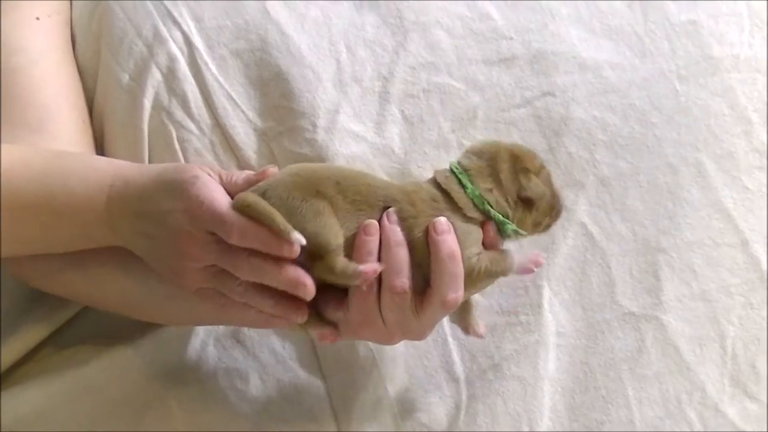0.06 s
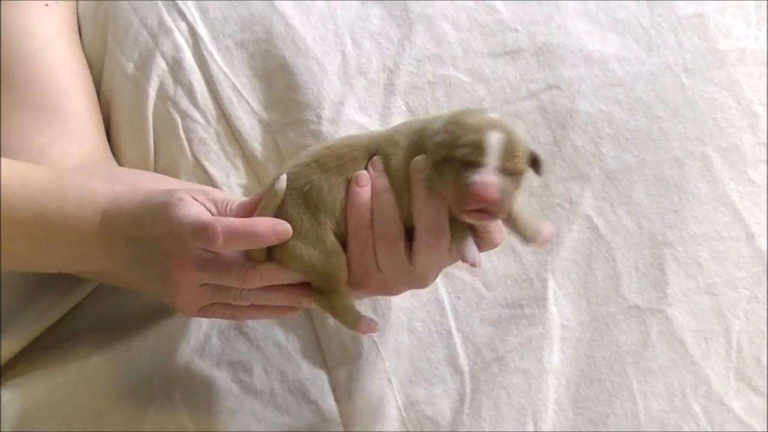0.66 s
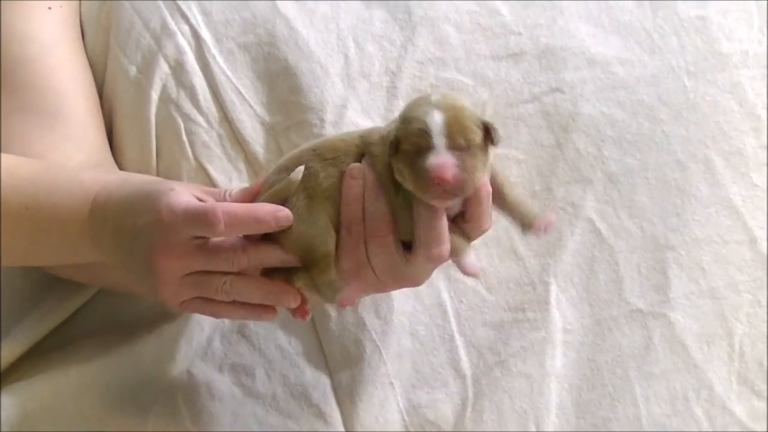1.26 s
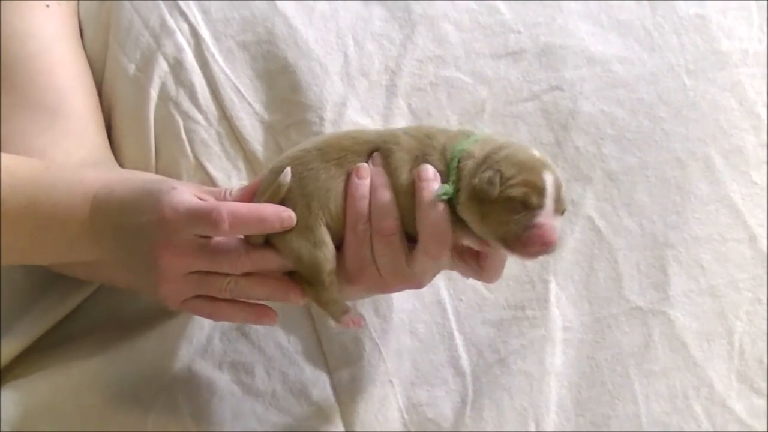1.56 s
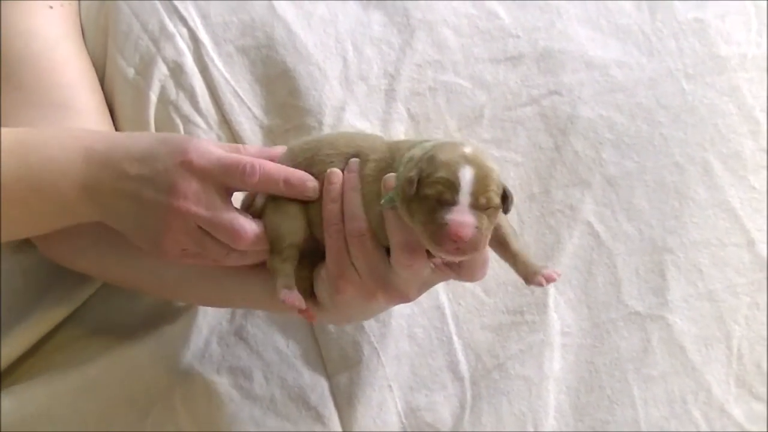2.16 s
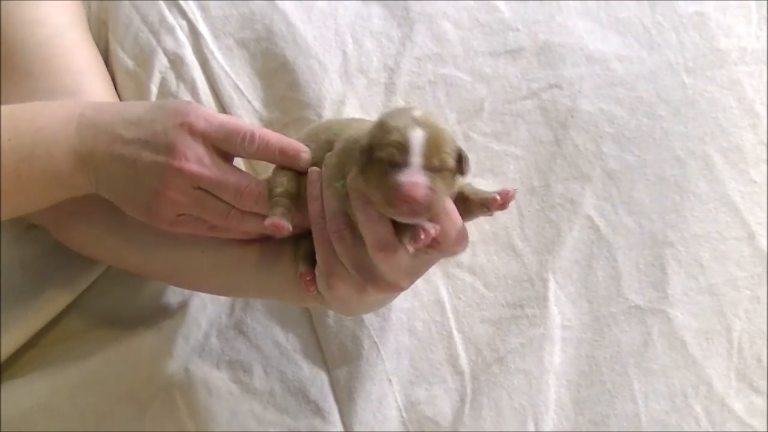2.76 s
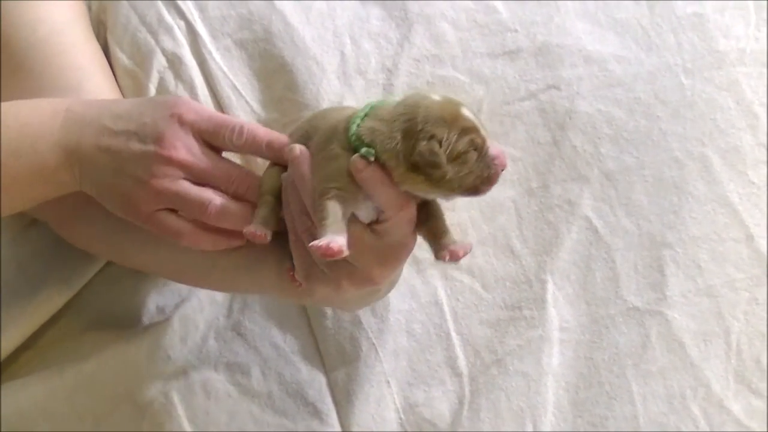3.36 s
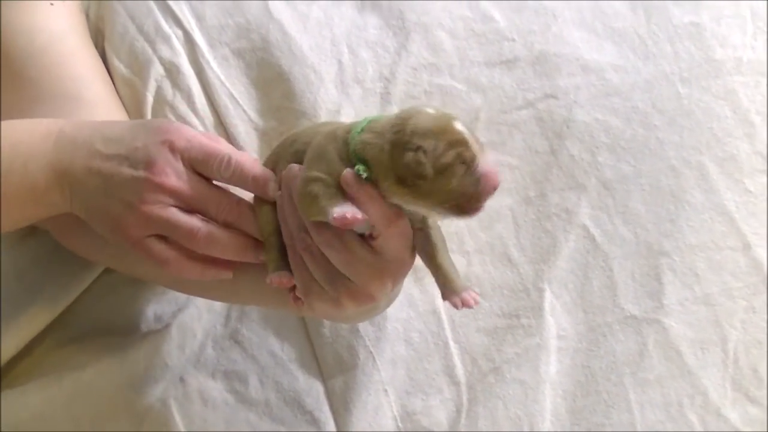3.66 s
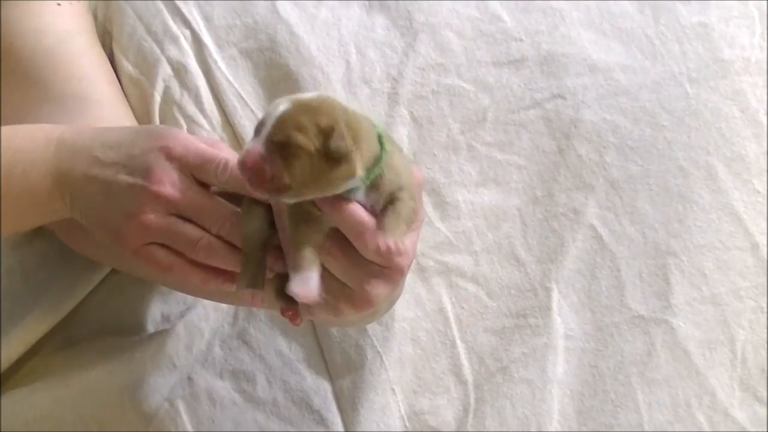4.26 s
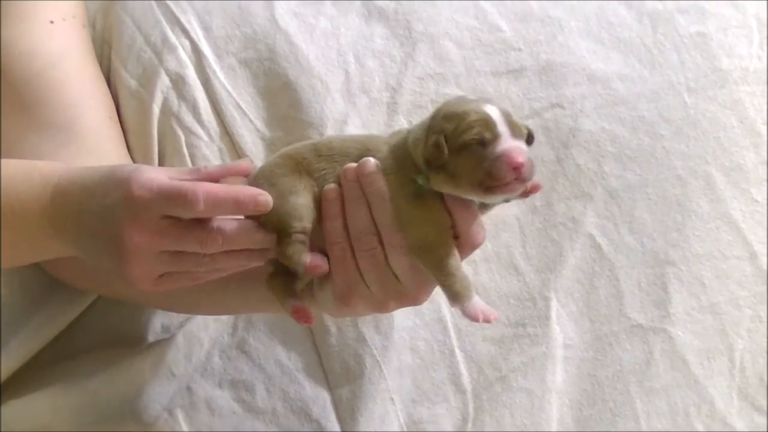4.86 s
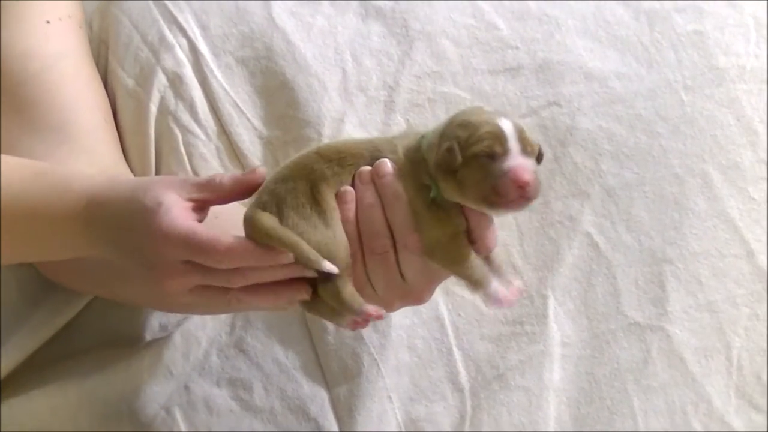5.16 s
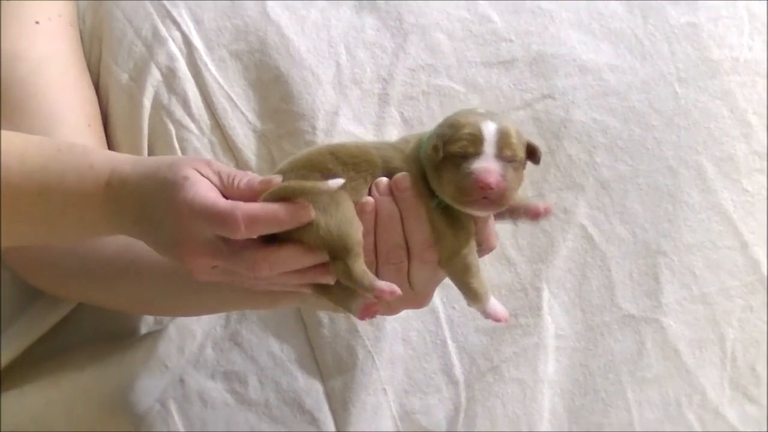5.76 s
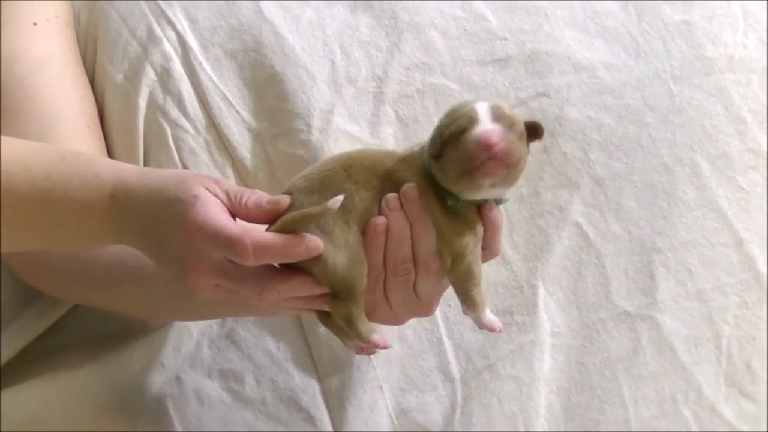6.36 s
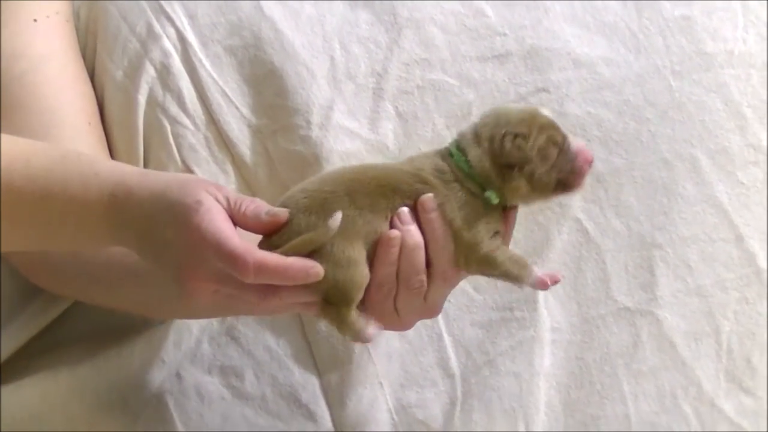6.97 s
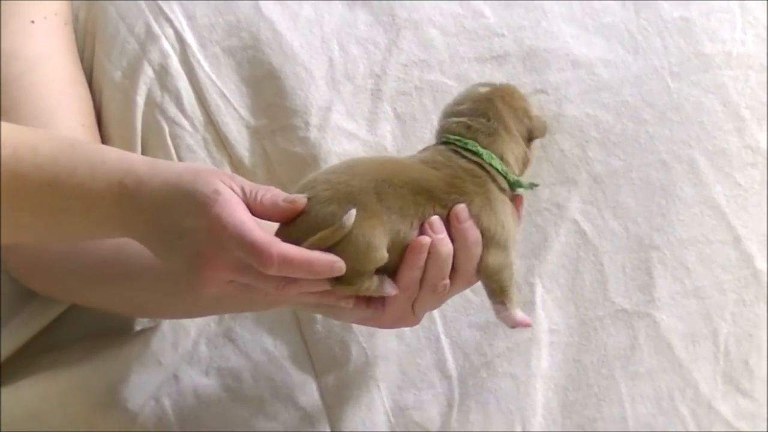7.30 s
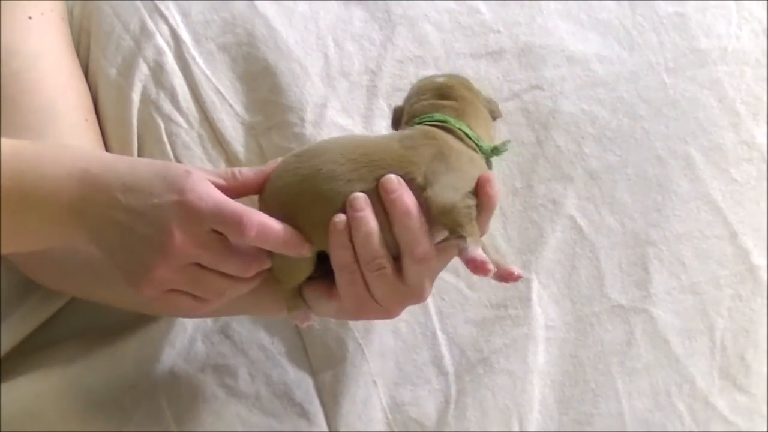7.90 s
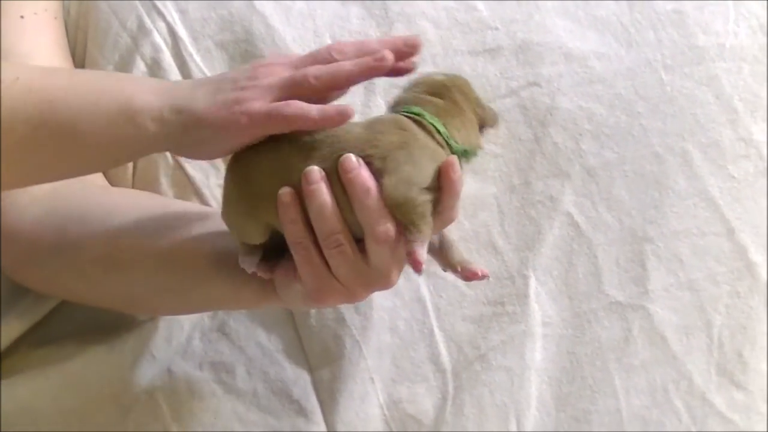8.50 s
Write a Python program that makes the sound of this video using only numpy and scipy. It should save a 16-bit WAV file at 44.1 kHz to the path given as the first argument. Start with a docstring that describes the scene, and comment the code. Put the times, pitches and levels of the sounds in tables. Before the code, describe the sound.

A newborn puppy cries close by in a small room, eighteen short cries, each a single tone that arches up and down in pitch with a brief echo. Two high squeals come in the first second. From about 1 to 2.5 seconds it drops to four weak, low, closed-mouth whines, and short snuffles puff through its snout between 0.5 and 3 seconds. From 3 to 4.7 seconds come four piercing squeals, the loudest stretch. A faint whimper at 5 seconds leads to three softer, gliding whines between 5.4 and 6.8 seconds. Two more loud squeals follow at 7 and 7.5 seconds, the first cracking hoarsely. A milder whine at 8 seconds and a low, quiet one at 8.5 seconds close it. A steady ventilation rumble with a low, wavering hum lies underneath throughout.

```python
"""A newborn puppy crying

A puppy, held in two hands in a small room, cries eighteen times: low closed-mouth whines and piercing
squeals. Each cry is one tone from its vocal folds, with harmonics (whole multiples of the pitch), that
arches up and down; the room smears the glides. Between the weak whines the puppy snuffles through its
snout. A ventilation rumble and a low hum lie underneath."""
import sys
import numpy as np
from scipy import signal
from scipy.fft import rfft, irfft, next_fast_len
from scipy.io import wavfile
from scipy.ndimage import uniform_filter1d, minimum_filter1d, map_coordinates

SR = 44100
rng = np.random.default_rng(int(sys.argv[2]) if len(sys.argv) > 2 else 0)


def dump(signal):
    """Clip the signal to [-1, 1] and save it as 16-bit WAV at the path in sys.argv[1]."""
    limited = np.clip(np.atleast_2d(signal).T, -1, 1)
    pcm = np.round(limited * 32767).astype(np.int16)
    wavfile.write(sys.argv[1], SR, pcm)


N = 385434
TOP_HZ = 15700  # upper edge of the sound
STEP = 32  # samples between updates of the overtone gains

# Treble colour of a whine: nasal peaks near 8 and 13 kHz, then a steep fall at the sound's
# upper edge: f/Hz, level/dB
WHINE_COLOUR = [(4000, -30), (5200, -26), (6500, -23.5), (8300, -9.5), (10500, -18.5), (12800, -9.5),
                (14200, -21), (15600, -48)]
# Treble colour of a squeal: peaks near 4, 7 and 10 kHz, then a steep fall at that edge: f/Hz, level/dB
SQUEAL_COLOUR = [(4200, 1), (5400, -22), (6200, -3), (7200, 0.5), (8700, -15.5), (10300, -5.5), (12500, -9),
                 (14200, -12.5), (15600, -30)]


def amp(db):
    """Turn decibels into a gain to multiply by."""
    return 10 ** (np.asarray(db) / 20)


def unit(x):
    """Scale x to an average power of 1."""
    return x / np.sqrt(np.mean(x ** 2) + 1e-20)


def along(points, hz):
    """Read a (frequency, value) table at hz, with octaves evenly spaced."""
    freqs, values = np.transpose(points)
    return np.interp(np.log(hz + 1), np.log(freqs), values)


def wobble(rate, size, per_second=SR):
    """A smooth curve through `rate` random values a second."""
    knots = rng.standard_normal(int(size * rate / per_second) + 4)
    fine = map_coordinates(knots, [np.arange(4 * len(knots)) / 4])
    return np.interp(4 * np.arange(size) * rate / per_second, np.arange(len(fine)), fine)


def filtered(x, response):
    """Multiply each frequency in x by response(hz)."""
    size = x.shape[-1]
    padded = next_fast_len(size + SR // 4)
    return irfft(rfft(x, padded) * response(np.fft.rfftfreq(padded, 1 / SR)), padded)[..., :size]


def coloured(noise, colour):
    """Shape noise by a (frequency, level) table, at a power of 1."""
    return unit(filtered(noise, lambda hz: amp(along(colour, hz))))


def noise_pair(likeness, size):
    """White stereo noise; a table says how alike left and right are at each frequency."""
    def shares(hz):
        angle = np.arccos(np.clip(along(likeness, hz), -1, 1)) / 2
        return np.array([np.cos(angle), np.sin(angle)])
    mid, side = filtered(rng.standard_normal((2, size)), shares)
    return np.array([mid + side, mid - side])


def ventilation(hum_hz=158.8, hum_db=-42.5, air_db=-32.32):
    """Moving air rumbles steadily, with a wavering hum."""
    # Colour of the rumble: f/Hz, level/dB
    rumble_colour = [(25, -42), (40, -17), (55, -12.5), (90, -8), (125, -6.5), (185, -1.5), (260, -3.5),
                     (430, -2.5), (620, -9), (1050, -10), (2000, -18.5), (4000, -27), (8000, -35),
                     (15000, -44.5)]
    # How alike the rumble is left and right: f/Hz, likeness (1 = same)
    rumble_likeness = [(50, 0.73), (150, 0.92), (1000, 0.81), (3000, 0.34), (10000, 0.057)]
    air = coloured(noise_pair(rumble_likeness, N), rumble_colour)
    hum = np.sqrt(2) * np.sin(2 * np.pi * hum_hz * np.arange(N) / SR + wobble(9.2, N))
    return amp(air_db) * air + amp(hum_db + 2.6 * wobble(14, N)) * hum


def pitch_arch(t, start, climb, crest, drop, corners_hz, bow_hz, turn_s=0.0211, catch_s=0.017):
    """The pitch of a cry climbs, rides a curved crest and drops, with rounded corners."""
    # The voice catches, so its pitch dips or jumps: t/s, change/share of the pitch
    catches = [(.255, -0.035), (3.058, 0.054), (3.112, -.015), (3.583, 0.029), (3.622, -0.021),
               (6.669, -0.042), (7.106, -.055), (7.139, .045), (7.562, 0.0077), (7.619, -0.047)]
    line = np.exp(np.interp(t, np.cumsum([0, climb, crest, drop]), np.log(corners_hz)))
    progress = np.clip((t - climb) / crest, 0, 1)
    bow = 4 * progress * (1 - progress)
    arch = uniform_filter1d(line + bow_hz * bow, size=int(turn_s * SR), mode="nearest")
    bends = sum(share * np.exp(-((start + t - at) / catch_s) ** 2) for at, share in catches)
    return arch * (1 + bends)


def effort(t, pitch, peak_s, fade_db, level_db, treble_db):
    """The three lowest harmonics and the treble swell to a peak, fade, and weaken at lower pitch."""
    # Piercing cries swell from further down: treble/dB, swell/dB
    swell_depths = [(-24.5, 12), (-19.5, 31.5)]
    # How harmonics 1 to 3 follow the effort: share of the swell, share of the fade
    shares = [(.55, 0.5), (.6, 0.61), (.7, 1)]
    swell = np.interp(treble_db, *np.transpose(swell_depths)) * np.clip(1 - t / peak_s, 0, 1)
    fade = fade_db * np.interp(t, [peak_s, t[-1]], [0, 1]) ** 0.64  # fastest just after the peak
    octaves = np.log2(pitch / pitch.max())
    low_db = [level_db - swells * swell - fades * fade + 5 * octaves for swells, fades in shares]
    return low_db, treble_db - swell - fade + 4.5 * octaves


def mouth_resonance(hz, mouth):
    """Decibels the mouth adds to a low harmonic; mouth runs from 0 (shut) to 1 (wide open)."""
    # Lower resonances (favoured frequencies) with the mouth shut: f/Hz, level/dB
    shut = [(550, -6), (950, 0.5), (1300, 6.5), (1650, 3.5), (2100, 9), (2600, 5), (3000, -5), (3600, -7),
            (4200, -34), (4800, -24)]
    # Lower resonances with the mouth wide open: f/Hz, level/dB
    wide = [(550, -10), (950, -11), (1300, 4.5), (1650, 3.5), (1900, 6.5), (2600, 11), (3000, 8),
            (3600, 11), (4200, 6.5), (4700, -13), (6000, -3.5)]
    return (1 - mouth) * along(shut, hz) + mouth * along(wide, hz)


def steadiness(scene_t, pitch, break_speed=9):
    """How regularly the vocal folds beat (1 = fully): fast glides and one hoarse crack upset them."""
    # The voice cracks in one squeal: t/s, half length/s, depth (0 to 1)
    crack = (7.18, 0.082, 0.34)
    centre, width, depth = crack
    glide_speed = np.gradient(np.log(pitch)) * SR
    hoarse = depth * np.exp(-((scene_t - centre) / width) ** 2)
    return (1 - hoarse) / (1 + (glide_speed / break_speed) ** 4)


def vocal_folds(pitch, mouth, steady, quiver=0.00319, strain=0.0071, jitter=0.0035, fray=0.02):
    """Phase of the beating folds: soft whines hold their pitch, squeals waver, fast glides turn rough."""
    waver = (quiver + strain * mouth) * wobble(79.18, len(pitch))
    rough = (jitter + fray * (1 - steady)) * wobble(700, len(pitch))
    return 2 * np.pi * np.cumsum(pitch * (1 + waver + rough)) / SR


def overtones(pitch, octave_db, treble, mouth, flutter_db=2):
    """Gains of harmonics 4 and up as they slide through the resonances of throat, nose and mouth."""
    # The throat muffles high harmonics: f/Hz, level/dB against the second harmonic
    throat = [(2100, -5), (2600, -15), (2900, -12), (3250, -22.5), (4000, -40.5), (5000, -43), (7000, -70)]
    hz = np.arange(4, TOP_HZ // pitch.min() + 1)[:, None] * pitch
    muffled = amp(octave_db + along(throat, hz))
    bright = amp((1 - mouth) * along(WHINE_COLOUR, hz) + mouth * along(SQUEAL_COLOUR, hz))
    share = np.sqrt(pitch / 1700)  # low cries share the treble among more overtones
    flutter = amp(flutter_db * np.array([wobble(61.7, len(pitch), SR / STEP) for _ in hz]))
    return (muffled + treble * share * bright) * flutter * (hz < TOP_HZ)


def breath(pitch, phase, mouth, steady, fray_hiss=0.15):
    """Air leaks through the folds, one puff a cycle, and hisses out of the nose or the open mouth."""
    # Slack folds leak more air: pitch/Hz, hiss/dB against the treble
    leakiness = [(600, -8.5), (1100, -7), (1500, -14.5), (2000, -48)]
    leak = amp(along(leakiness, pitch)) + fray_hiss * (1 - steady)
    nasal = coloured(rng.standard_normal(len(mouth)), WHINE_COLOUR)
    shrill = coloured(rng.standard_normal(len(mouth)), SQUEAL_COLOUR)
    hiss = np.sqrt(1 - mouth) * nasal + np.sqrt(mouth) * shrill
    return leak * unit(hiss * (1 + np.cos(phase)))


def cry(row, shimmer_db=1.38, strain_db=0.46, shut_db=-34, open_db=-23,
        attack_s=0.012, bloom_s=0.025, release_s=0.0016):
    """One cry: a stack of harmonics from the vocal folds, with a little breath in it."""
    start, climb, crest, drop, *corners_hz, bow_hz = row[:9]
    peak_s, fade_db, level_db, second_db, third_db, peak_treble_db = row[9:]
    t = np.arange(0, climb + crest + drop, 1 / SR)
    pitch = pitch_arch(t, start, climb, crest, drop, corners_hz, bow_hz)
    effort_db, treble_db = effort(t, pitch, peak_s, fade_db, level_db, peak_treble_db)
    mouth = np.clip((treble_db - shut_db) / (open_db - shut_db), 0, 1)  # harder cry, wider mouth
    treble = amp(treble_db) * np.clip(t / bloom_s, 0, 1)  # every cry starts dull
    steady = steadiness(start + t, pitch)
    phase = vocal_folds(pitch, mouth, steady)
    low_db = [effort_db[k - 1] + db + mouth_resonance(k * pitch, mouth)
              for k, db in enumerate([0, second_db, third_db], 1)]
    low = sum(amp(db) * np.sin(k * phase) for k, db in enumerate(low_db, 1))
    clear_treble = treble * np.sqrt(steady)  # unsteady folds trade tone for hiss
    gains = overtones(pitch[::STEP], low_db[1][::STEP], clear_treble[::STEP], mouth[::STEP])
    high = sum(np.interp(t, t[::STEP], gain) * np.sin(k * phase) for k, gain in enumerate(gains, 4))
    # the folds close with uneven strength, more so under strain
    shimmer = amp((shimmer_db + strain_db * mouth) * wobble(204.9, len(t)))
    flicker = amp(0.85 * wobble(63.4, len(t)))
    tone = np.sqrt(2) * (low + high * flicker) * shimmer
    air = treble * breath(pitch, phase, mouth, steady)
    return (tone + air) * np.clip(t / attack_s, 0, 1) * np.clip((t[-1] - t) / release_s, 0, 1)


def cries(lead_s=0.004):
    """The puppy whines and squeals, each cry starting just ahead of its listed time."""
    # One arch of pitch and effort a row: t/s, climb/s, crest/s, drop/s,
    # start pitch/Hz, crest start/Hz, crest end/Hz, end pitch/Hz, upward bow of the crest/Hz,
    # time to peak effort/s, fade/dB, then, before the resonances: first harmonic/dB,
    # second and third harmonic/dB against the first, treble/dB
    cry_rows = [ (.02, 0.1, .222, .05, 640, 1805, 1671, 880, 106, 0.11, 17.3, -20.5, 0.5, -9, -18.5),
                (.565, 0.12, 0.071, 0.12, 591, 1767, 1587, 796, 12, 0.14, 16.2, -18.5, 0, -9.5, -16.5),
                (1.07, 0.13, 0.053, 0.051, 543, 1022, 900, 682, 46.5, 0.13, 8.9, -25.5, -5, -8, -31.5),
                (1.49, 0.029, .075, 0.077, 591, 590.5, 831, 872.5, 9.5, 0.11, 2, -27.5, -3.5, -8, -36),
                (1.84, 0.051, 0.093, 0.048, 558, 653, 647.3, 620, 7, 0.15, 22, -30.5, -1, -6, -41.5),
                (2.269, 0.022, 0.032, 0.045, 490, 522, 593, 565, 0, 0.018, 8.6, -33, -4, -10.5, -45),
                (2.951, 0.089, .23, 0.034, 691, 1888, 1992, 1398, 124.5, 0.095, 15.1, -15.5, -2, -6.5, -13.5),
                (3.475, .062, 0.23, 0.023, 894, 1795, 1950, 1506, 266, 0.076, 14.2, -12.5, -3, -5, -11),
                (3.96, 0.086, 0.16, 0.063, 655, 1504, 1723, 993, 245, .08, 19, -12, -1.5, -5.5, -7.5),
                (4.455, 0.065, 0.15, 0.067, 813, 1568, 1812, 1192, 196.5, 0.076, 11.3, -16.5, 0, -5, -15.5),
                (4.926, 0.015, 0.062, 0.058, 589, 615.5, 664, 626, 1.5, 0.032, 3.8, -33, -1.5, -4, -41),
                (5.36, 0.18, 0.079, 0.15, 460, 1650, 1096, 927.5, 135, 0.21, 2.3, -24.5, -.5, -6, -30),
                (5.935, .117, .138, .044, 604, 988.5, 1270, 957, 224.5, 0.14, 3.9, -23.5, -0.5, -8, -27.5),
                (6.395, 0.14, 0.14, 0.11, 529.5, 1582, 1274, 987, 144.5, 0.055, 2.4, -26, 2, -4, -28.5),
                (6.965, 0.074, .168, 0.082, 853, 1684, 1939, 1184, 24.5, 0.082, 9.9, -18, 0.5, -1.5, -17),
                (7.46, 0.092, 0.15, 0.16, 709, 1866, 2030, 1372, -1, 0.086, 9.7, -15, -2.4, -2.5, -18.5),
                (8.035, .08, 0.1, 0.053, 582, 924, 1064, 897, 87, 0.15, 10.4, -27.5, 4.5, 0.5, -35),
                (8.47, 0.1, 0.07, 0.12, 516, 696, 728.6, 631, -1, .19, 15, -28, -2, -3, -44.5), ]
    track = np.zeros(N + SR)
    for row in cry_rows:
        sound = cry(row)
        first = max(0, round((row[0] - lead_s) * SR))
        track[first:first + len(sound)] += sound
    return track[:N]


def snuffles():
    """Short puffs of air rush through the puppy's snout."""
    # The puffs: middle t/s, length/s, level/dB
    puffs = [(0.583, 0.1, -34.5), (1.067, 0.1, -33), (1.518, 0.14, -39), (1.738, 0.088, -34),
             (2.223, 0.11, -32.5), (2.457, 0.066, -32), (2.689, 0.074, -34), (2.926, 0.093, -32.5)]
    # Colour of a snuffle: f/Hz, level/dB
    snout = [(300, -36), (900, -14.5), (1250, -8), (1520, -2.5), (1850, -19), (2800, -25), (4500, -42),
             (9000, -54), (14000, -54)]
    t = np.arange(N) / SR
    flow = sum(amp(db) * np.cos(np.pi * np.clip((t - at) / length, -.5, .5)) for at, length, db in puffs)
    return flow * coloured(rng.standard_normal(N), snout)


def room(x, early_db=-5, early_decay_s=0.02, tail_db=0.5, gap_s=0.0015):
    """The direct sound, a burst of echoes from near walls, and a tail whose top treble dies first."""
    # How long the room rings: f/Hz, time to fade by 60 dB/s
    ring_times = [(500, 0.25), (2000, 0.23), (4000, 0.26), (8000, 0.2), (14000, 0.15)]
    # How alike the echoes are left and right: f/Hz, likeness (1 = same)
    echo_likeness = [(700, 0.93), (2000, 0.71), (4000, 0.56), (10000, -0.3)]
    hz, t, bands = signal.stft(noise_pair(echo_likeness, SR // 2), SR, nperseg=256)
    decay = amp(-60 * t / along(ring_times, hz)[:, None])
    tail = signal.istft(bands * decay, SR, nperseg=256)[1]
    age = np.arange(tail.shape[1]) / SR
    early = noise_pair(echo_likeness, len(age)) * amp(-60 * age / early_decay_s)
    arrived = np.clip(age / gap_s - 1, 0, 1)
    echoes = amp(early_db) * unit(early * arrived) + amp(tail_db) * unit(tail * arrived)
    return x + signal.oaconvolve(x[None], echoes / np.sqrt(len(age)), axes=1)[:, :N]


def placed(x, right_db):
    """Make the right side louder than the left by right_db."""
    return x * amp([[-right_db / 2], [right_db / 2]])


def scene():
    """The puppy in the room, over the ventilation, both a little to the right."""
    puppy = room(amp(-1.06) * cries() + snuffles())
    return placed(puppy, right_db=1.0) + placed(ventilation(), right_db=2.0)


def record(dry, knee_db=-8, squeeze=0.53, ceiling=1.0):
    """Gain control turns loud squeals down a little, a limiter holds their peaks, the very top is cut."""
    power = np.abs(uniform_filter1d(np.mean(dry ** 2, axis=0), size=1300))
    ducked = dry * (1 + power / amp(knee_db) ** 2) ** -squeeze
    safe_gain = np.minimum(1, ceiling / (np.abs(ducked).max(axis=0) + 1e-9))
    smooth_gain = uniform_filter1d(minimum_filter1d(safe_gain, size=600), size=600)
    return filtered(ducked * smooth_gain, lambda hz: hz < TOP_HZ)


dry = scene()
out = record(dry)
dump(out)
```